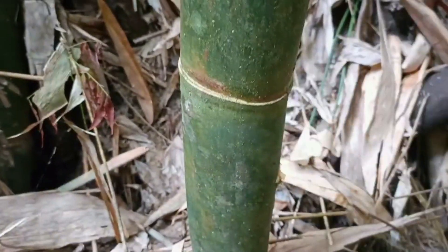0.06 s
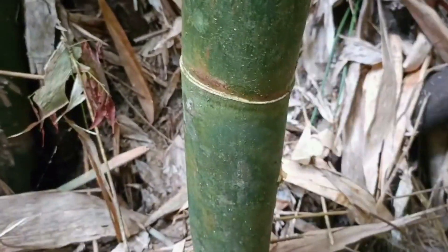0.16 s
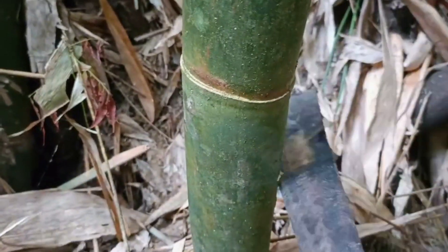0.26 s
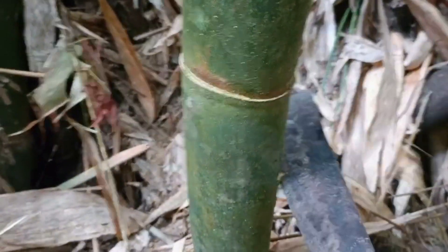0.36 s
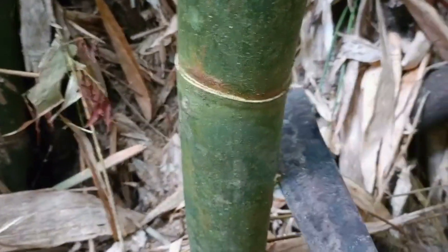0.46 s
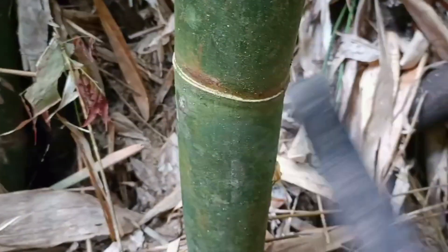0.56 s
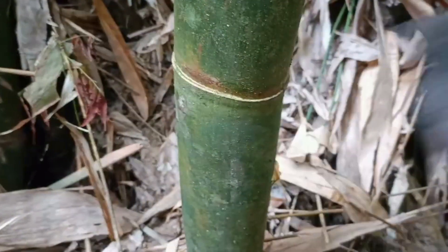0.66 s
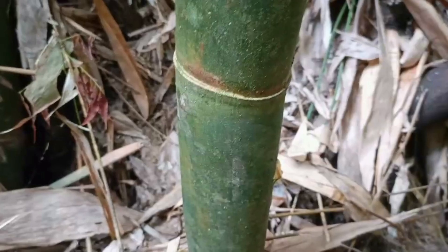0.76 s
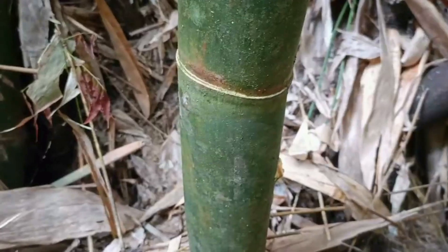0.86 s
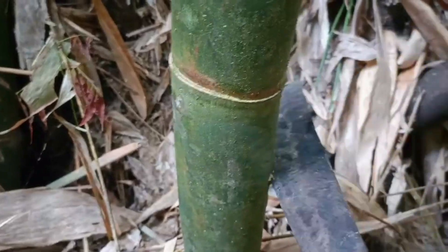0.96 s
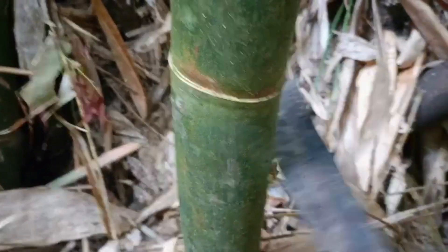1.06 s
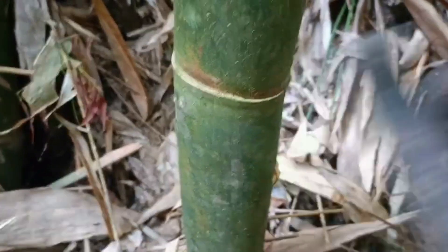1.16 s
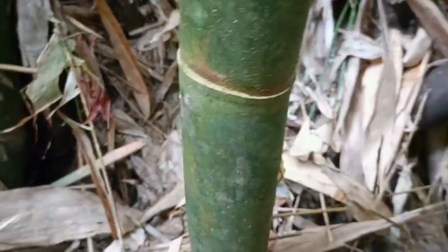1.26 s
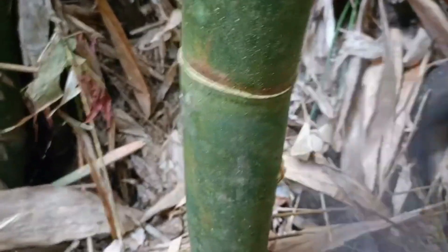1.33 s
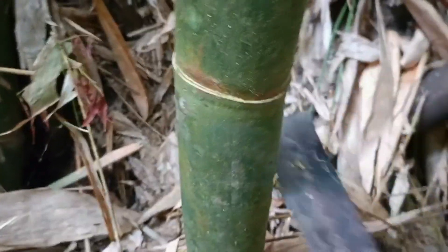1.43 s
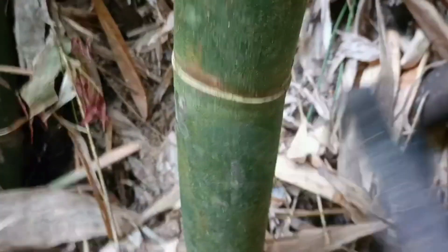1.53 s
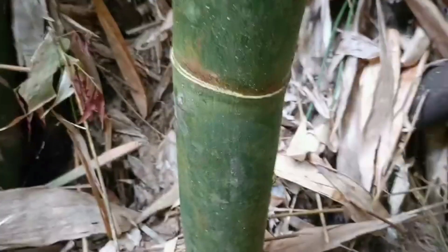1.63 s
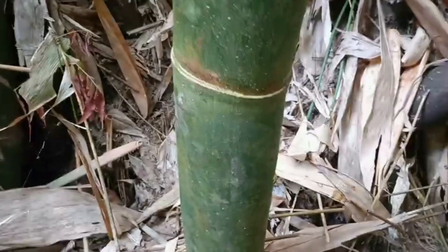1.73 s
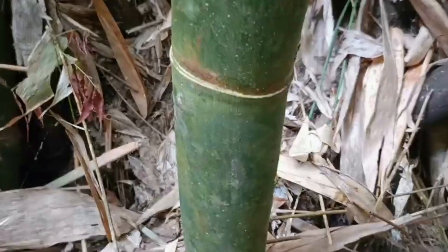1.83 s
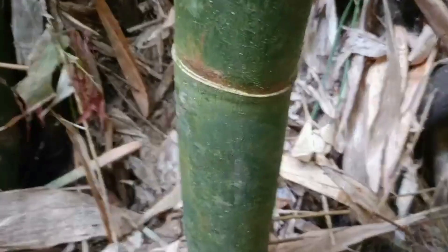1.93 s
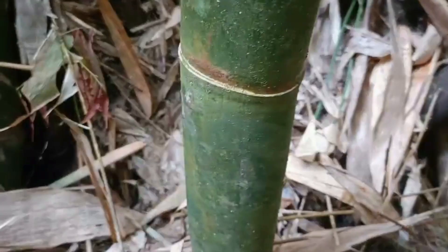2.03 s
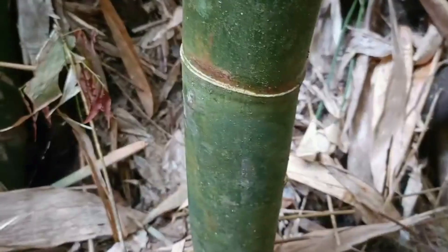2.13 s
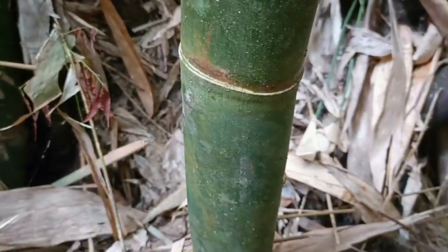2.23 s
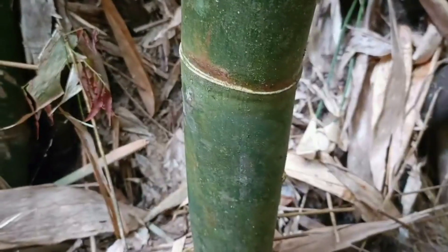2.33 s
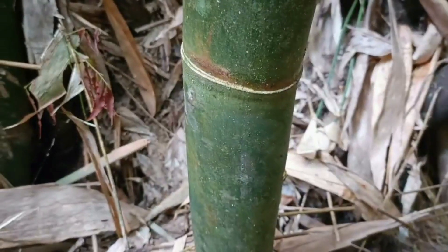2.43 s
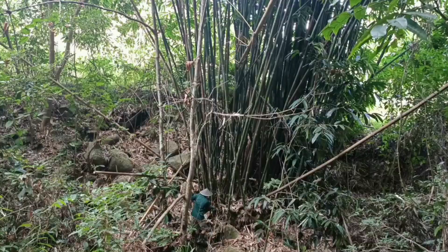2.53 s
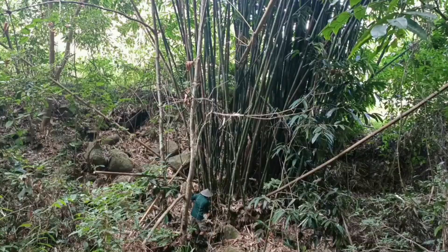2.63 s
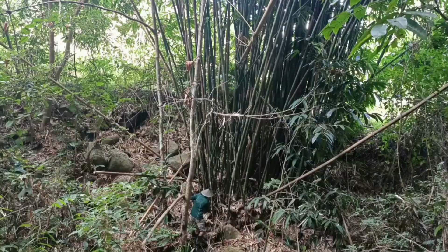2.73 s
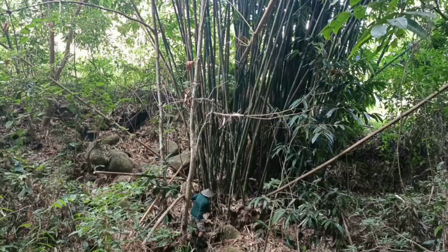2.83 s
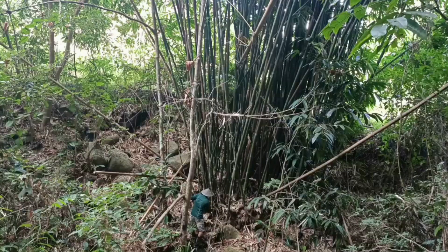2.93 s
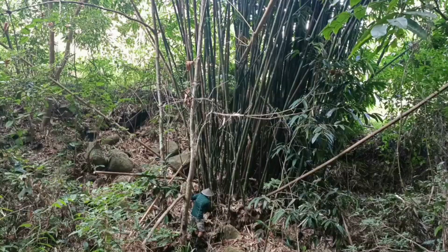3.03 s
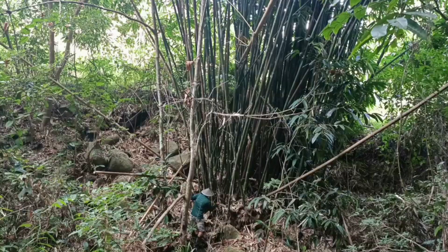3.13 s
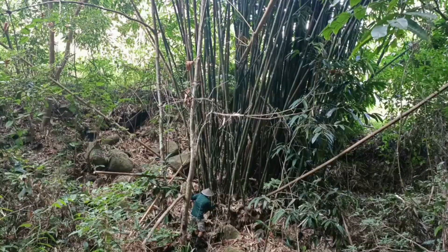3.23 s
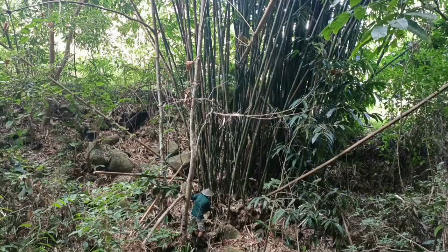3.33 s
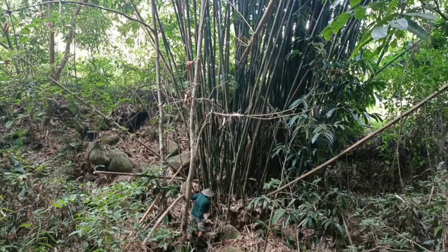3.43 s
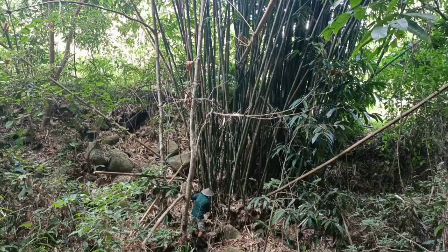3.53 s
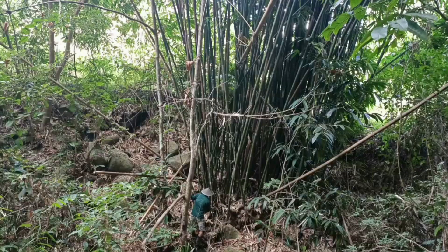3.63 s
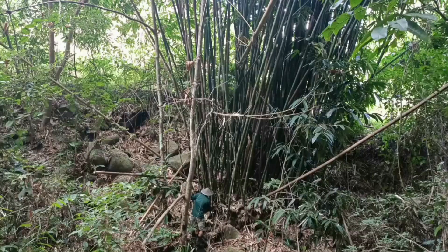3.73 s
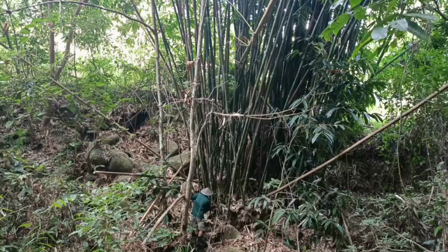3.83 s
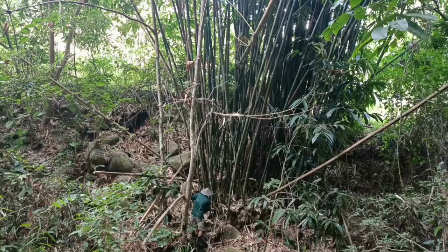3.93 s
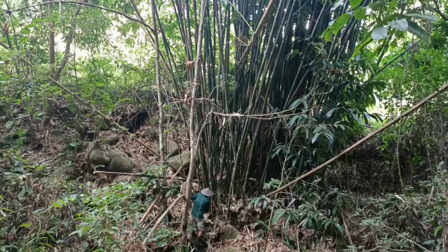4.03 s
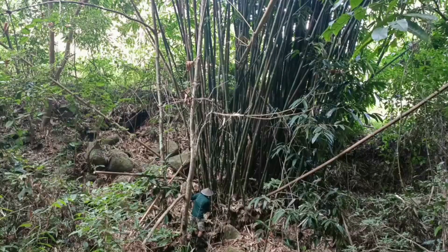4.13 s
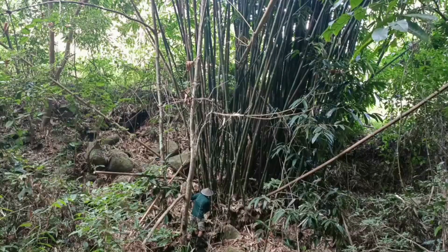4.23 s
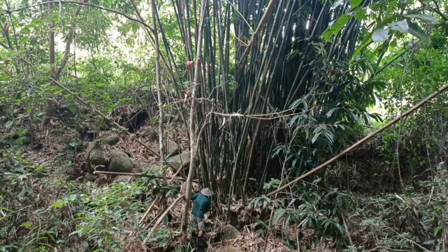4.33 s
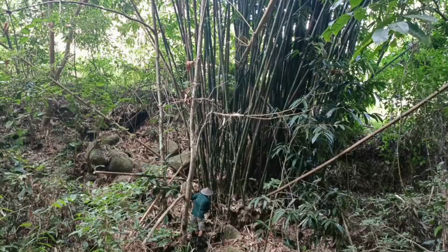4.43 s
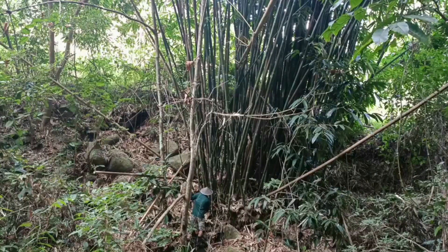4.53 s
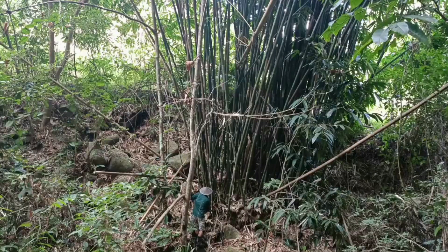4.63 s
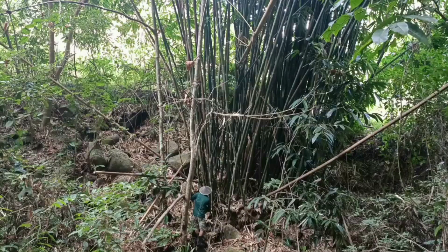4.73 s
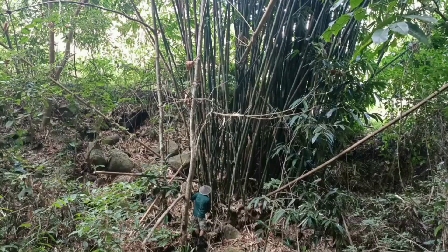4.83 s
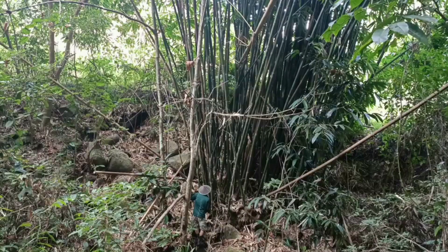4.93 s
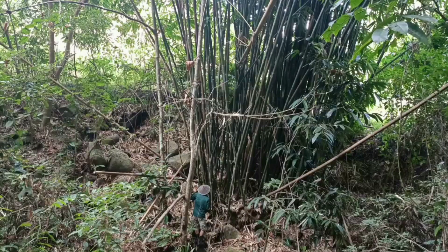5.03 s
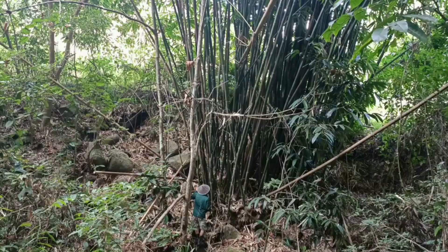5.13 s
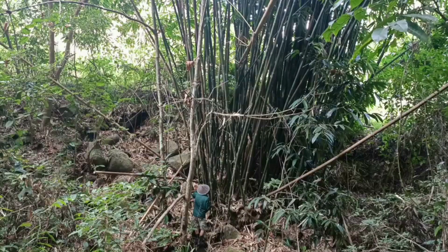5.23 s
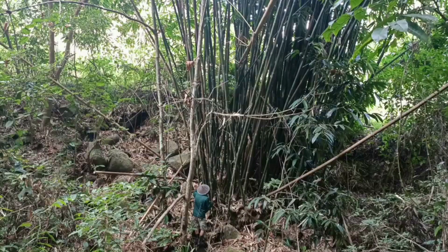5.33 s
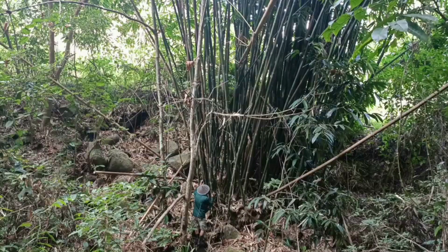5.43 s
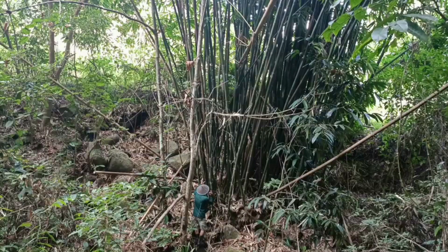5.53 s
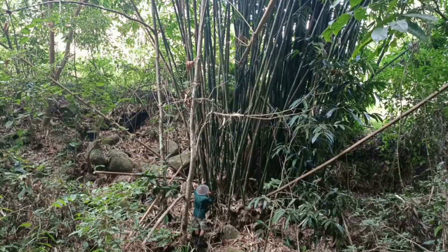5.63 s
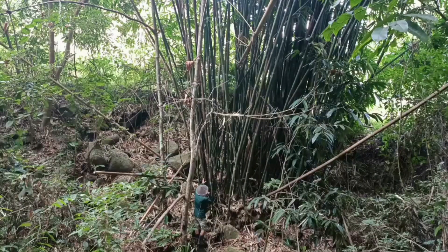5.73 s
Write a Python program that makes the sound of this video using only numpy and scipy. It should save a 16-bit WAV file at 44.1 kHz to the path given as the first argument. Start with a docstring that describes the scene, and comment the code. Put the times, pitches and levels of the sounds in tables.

```python
"""A blade chops a green bamboo stem in a forest: three blows close by, then four heard across a gully. Close: a
crack of noise, the blade's short decaying ring, and dispersive bending waves that return treble first. Far: a
thin crack, then a bright tail of decaying noise, scattered by the grove. Broad shaped noise washes under both
places, with soft bumps, taps, rustles and bits of far knocks as puffs of noise."""
import sys
import numpy as np
from scipy import signal
from scipy.fft import irfft
from scipy.io import wavfile
from scipy.ndimage import uniform_filter1d

SR = 44100
rng = np.random.default_rng(int(sys.argv[2]) if len(sys.argv) > 2 else 0)


def to_wav(sig):
    """Store sig (one row per channel, or 1-D mono) as 16-bit WAV at the path in sys.argv[1].

    Samples outside -1..1 are clipped; the rate is SR.
    """
    pcm = np.clip(np.atleast_2d(sig), -1, 1) * 32767
    pcm = np.round(pcm).astype(np.int16)
    wavfile.write(sys.argv[1], SR, pcm.T)  # frames by channels


N = 254213
T = np.arange(N) / SR
NEAR_END_S, FAR_START_S = 2.549, 2.5572  # a hush lies between the two places

# close blows: start_s, crack_db, crack_t60_s, stem_wave_db, bite_place (0-1), ring_db, ring_tilt_db_per_octave
NEAR_BLOWS = [(.405, -6, 0.02, -25, .192, -4.5, 1.5), (1.0781, -5.5, 0.024, -22, .212, -0.5, -2.8),
              (1.509, -6, 0.015, -19, 0.8, 2.5, -2)]
# modes of blade and stem: pitch_hz, t60_s, width_hz of the hump each gives the noise, level_db
RING_MODES = [(752, 0.08, 630, -8), (1460, 0.051, 120, 0.5), (1940, 0.074, 350, -11.5),
              (2297, 0.061, 440, 3.5), (3300, 0.019, 120, 1.5), (3814, 0.03, 590, -4.5),
              (4640, 0.042, 180, 3.5), (5400, 0.015, 270, -2.6), (6770, 0.016, 1100, 2.5),
              (10835, 0.023, 1600, 5)]
# left-right correlation of the noise at each place: frequency_hz, correlation (-1 to 1)
LIKENESS_NEAR = [(60, 0.67), (180, 0.98), (540, 0.83), (1620, -0.19), (4870, 0.043), (14600, 0.016)]
LIKENESS_FAR = [(60, 0.44), (180, 1), (540, 0.36), (1620, 0.012), (4870, -0.0027), (14600, -0.064)]


def gain_of(db):
    """The decibel is logarithmic: 20 dB is a tenfold amplitude."""
    return 10 ** (np.asarray(db) / 20)


def evened(x):
    """Normalization of power: scales to rms 1."""
    return x / np.sqrt(np.mean(x ** 2) + 1e-20)


def read(points, hz):
    """Interpolation of a spectrum along a logarithmic frequency axis."""
    point_hz, value = np.transpose(points)
    return np.interp(np.log(hz + 1), np.log(point_hz + 1), value)


def left_right(left_db, right_db):
    """Intensity panning: one level for each channel."""
    return np.array([[left_db], [right_db]])


def add(mix, s, sound):
    """Superposition: mixes a stereo sound in at time s."""
    part = mix[:, round(s * SR):][:, :sound.shape[1]]
    part += sound[:, :part.shape[1]]


def noise(size, field_db, likeness, frame):
    """Short-time synthesis of partly correlated stereo noise with levels field_db(Hz, s)."""
    hz = np.fft.rfftfreq(frame, 1 / SR)[:, None]
    t = np.arange(4 * size // frame + 5) * frame / 4 / SR
    a, b, c, d = rng.standard_normal((len(t), len(hz), 4)).T
    same = np.clip(read(likeness, hz), -1, 1)
    left, independent = a + 1j * b, c + 1j * d
    right = same * left + np.sqrt(1 - same ** 2) * independent
    bins = np.array([left, right]) * gain_of(field_db(hz, t))
    return signal.istft(bins, nperseg=frame, noverlap=3 * frame // 4)[1][:, :size]


def wash(colour, level_db, bass, likeness, patchy_db, pan_db):
    """Filtered random noise: a broad rush, its low end lumpy in patches and varying in level."""
    def field(hz, t):
        patches = rng.standard_normal((len(t), len(hz))).T
        patches = uniform_filter1d(uniform_filter1d(patches, size=14, axis=0), size=8, axis=1)
        bass_db = np.interp(t, *np.transpose(bass)) + patchy_db * evened(patches)
        return read(colour, hz) + bass_db / (1 + (hz / 1200) ** 2)
    return evened(noise(N, field, likeness, frame=1024)) * gain_of(level_db + left_right(pan_db, -pan_db))


def near_wash():
    """Quasi-stationary noise whose level dips at each blow and recovers exponentially."""
    # spectrum of the close wash: frequency_hz, level_db (relative, per Hz)
    colour = [(15, -76), (25, -82), (103, -13.5), (176, -16.5), (278, -4), (488, -7), (673, -11.5),
              (856, -3.5), (1090, -11.5), (1630, -9.5), (4620, -13.5), (7400, -16.5), (8100, -20),
              (14200, -21.5)]
    # bass of the close wash, before the whole is scaled: time_s, extra_db (fading out above some 1.2 kHz)
    bass = [(0.0, 4), (.5, 1.2), (1.2, 3.5), (2.55, 4)]
    level_db, dip_db, recover_s = -38, 4.5, 0.29
    for s, *_ in NEAR_BLOWS:
        level_db = level_db - dip_db * (T > s) * np.exp(-abs(T - s) / recover_s)
    return wash(colour, level_db, bass, LIKENESS_NEAR, patchy_db=2.4, pan_db=0.22)


def far_wash():
    """Quasi-stationary noise whose level drifts slowly."""
    # spectrum of the far wash: frequency_hz, level_db (relative, per Hz)
    colour = [(15, -60), (53, -21), (103, -3), (191, -19), (280, -4.5), (450, 0), (570, -8), (769, -1),
              (1100, -5.5), (1420, -5), (2370, -7.5), (7400, -13.5), (8100, -19), (14200, -21)]
    # course of the far wash: time_s, level_db
    course = [(2.56, -47), (4.1, -46.5), (5.76, -47.5)]
    level_db = np.interp(T, *np.transpose(course))
    return wash(colour, level_db, [(0, 0)], LIKENESS_FAR, patchy_db=1.5, pan_db=0.54)


def puffs(rows, likeness, pan_db, narrow_db):
    """Band-limited noise bursts: short puffs around one pitch."""
    out, t = np.zeros((2, N)), np.arange(6000) / SR
    for s, db, pitch_hz, length_s in rows:
        def field(hz, u):
            octaves = abs(np.log2((hz + 1) / pitch_hz))
            return -narrow_db * octaves ** 0.63 + 0 * u
        puff = evened(noise(len(t), field, likeness, frame=512))
        envelope = np.minimum(t / 0.0042, 1) * np.exp(-(t / length_s) ** 3)
        add(out, s, gain_of(db) * puff * envelope)
    return out * gain_of(left_right(pan_db, -pan_db))


def rings_struck(place, level_db, tilt_db):
    """Modal excitation: a mode rings strongly if struck at a crest of its shape, weakly at a node."""
    hz, *_, db = np.transpose(RING_MODES)
    half_waves = np.sqrt(hz / 84.1)  # along the blade; one at 84.1 Hz
    shape = abs(np.sin(np.pi * place * half_waves)) + .05
    return db + level_db + tilt_db * np.log2(hz / 3000) + 20 * np.log10(shape)


def struck(colour, hz, rings_db, lift_db):
    """Resonance: the common spectrum gains a hump at every mode, as high as the mode was struck hard."""
    humps = 0
    for (mode_hz, _, width_hz, _), db in zip(RING_MODES, rings_db):
        humps = humps + gain_of(db + lift_db) / (1 + (2 * (hz - mode_hz) / width_hz) ** 2)
    return read(colour, hz) + 20 * np.log10(1 + humps)


def crack(colour, rings_db, likeness, envelope, lift_db, ring_db, rise_s, uneven_db):
    """Impulsive excitation: fibres split in an uneven noise burst, and the same blow starts free decays."""
    t = np.arange(6000) / SR

    def field(hz, s):
        return struck(colour, hz, rings_db, lift_db) + 0 * s
    burst = evened(noise(len(t), field, likeness, frame=256))
    roughness = evened(uniform_filter1d(rng.standard_normal(len(t)), size=60))
    burst = burst * envelope(t) * gain_of(uneven_db * roughness)
    ring = 0
    for (hz, t60, *_), db in zip(RING_MODES, rings_db):
        turn = rng.random((2, 1))  # starting phase per channel, in cycles
        ring = ring + gain_of(db - 60 * t / t60) * np.sin(2 * np.pi * (hz * t + turn))
    return (burst + gain_of(ring_db) * ring) * np.minimum(t / rise_s, 1) ** 2


def far_blows():
    """Multiple scattering: the nearest stems stretch the crack to some 15 ms and the grove adds a tail."""
    # far blows: start_s, crack_db, rise_s, tail_db, late_share (0-1), bite_place (0-1),
    # ring_db, ring_tilt_db_per_octave
    blows = [(2.844, -26, 0.00057, -28.5, 0.2, .796, -.7, -.4),
             (3.633, -23.5, 0.0011, -28, 0.1, .716, -2.1, -2.8),
             (4.231, -35, .003, -36, 0.6, .956, -1.2, -3.6), (4.658, -41, 0.009, -45, 0.34, .67, 5, -3)]
    # spectra of the far crack and of the tail: frequency_hz, level_db (relative, per Hz)
    crack_colour = [(120, -37), (300, -21), (1000, 0.5), (2300, -0.5), (2700, -9), (3200, -3), (7400, 1),
                    (8100, -9), (14200, -7)]
    tail_colour = [(88, -55), (243, -7), (459, -5.5), (620, -16), (1270, -5.5), (2300, -3.5), (2700, -6.5),
                   (3200, -5.5), (7300, -9.5), (8100, -11), (14200, -17)]
    # decay of the tail: frequency_hz, t60_s
    tail_t60 = [(200, 0.35), (1500, 0.38), (5000, 0.62), (12000, 0.59)]
    out, t = np.zeros((2, N)), np.arange(30000) / SR
    for s, db, rise_s, tail_db, late, *bite in blows:
        rings_db = rings_struck(*bite)

        def stretched(u):
            return (1 + 0.72 * np.exp(-u / 0.0017)) * np.exp(-((u - rise_s) / 0.015) ** 4)

        def tail_field(hz, u):
            return struck(tail_colour, hz, rings_db, 3.2) - 60 * u / read(tail_t60, hz)
        direct = crack(crack_colour, rings_db, LIKENESS_FAR, stretched,
                       lift_db=22.0, ring_db=-4, rise_s=rise_s, uneven_db=0.75)
        add(out, s, gain_of(db + left_right(2.2, -2.2)) * direct)
        tail = noise(len(t), tail_field, LIKENESS_FAR, frame=512)
        tail = tail / np.std(tail[:, :2000])
        late = np.clip(late, 0, 1)
        early_part = (1 - late) * np.minimum(t / 0.0025, 1)
        late_part = 2.9 * late / (1 + np.exp(-(t - .045) / 0.016))  # a farther slope answers
        # single stems answer unevenly
        stems_db = 0.69 * evened(uniform_filter1d(rng.standard_normal(len(t)), size=200))
        add(out, s, gain_of(tail_db + stems_db + left_right(2.1, -2.1)) * (early_part + late_part) * tail)
    return out


def stem_wave(count=70, stiff_hz=90.76, spread_s=0.00082, apart=0.37):
    """Dispersion: bending waves return from nodes and branches, treble first, as speed grows as sqrt(Hz)."""
    # spectrum of the stem wave: frequency_hz, level_db (relative, per Hz)
    colour = [(18, -74), (30, -52), (112, -8.5), (160, -16.5), (199, -5.5), (238, -17.5), (290, 0),
              (424, -10.5), (478, -7.5), (698, -15.5), (771, -6), (922, -12.5), (1150, -11), (1580, -22),
              (3500, -27), (4550, -76), (7700, -120)]
    first_s, build_s, hold_s, fall_db_per_s, last_s = 0.0074, 0.029, 0.053, 385, .12
    hz = np.fft.rfftfreq(16384, 1 / SR)
    draw = rng.random((count, 5))
    travel_s = last_s * (np.arange(count) + draw[:, 0]) / count  # at 300 Hz
    # the first waves die at once; echoes build up, hold, then fall away
    echoes = np.minimum(travel_s / build_s, 1) * gain_of(-fall_db_per_s * np.maximum(travel_s - hold_s, 0))
    size = (np.exp(-travel_s / first_s) + echoes) * np.sign(draw[:, 1] - .5)
    # the rooted foot keeps the lowest waves from lagging far
    bend = np.sqrt((300 + stiff_hz) * (hz + stiff_hz))
    out = []
    # each return leaves the stem at another height and angle
    for skew, side in ((draw[:, 2], 1), (draw[:, 3], -1)):
        phase = 4 * np.pi * travel_s[:, None] * bend + 2 * np.pi * hz * spread_s * skew[:, None]
        share = 1 + side * apart * (4 * draw[:, 4] - 2)
        returns = (size * share) @ np.exp(-1j * phase)
        out.append(irfft(gain_of(read(colour, hz)) * returns)[:12000])
    out = np.array(out)
    return out / np.sqrt(np.mean(out[:, :3000] ** 2))


def hollow(note_hz=282.3, glide=3.3):
    """Cavity resonance: the hollow section booms as slow waves arrive, each note sagging in pitch."""
    # arrivals at the hollow section: delay_s, level_db, length_s
    arrivals = [(.038, -1.5, 0.022), (.059, -6, 0.014), (.083, -15, .014)]
    out = np.zeros((2, 6000))
    for s, db, length_s in arrivals:
        t = np.arange(round(length_s * SR)) / SR
        turn, offset = rng.random(2)
        turns = turn + 0.062 * np.array([[0], [offset]])  # the right channel leads slightly in phase
        cycles = note_hz * t * (1 - glide * (t - length_s))
        note = np.sin(2 * np.pi * (cycles + turns))
        add(out, s, gain_of(db) * note * signal.windows.tukey(len(t), .6))
    return out


def near_blows():
    """Impact: a crack, stem wave, hollow note, low push through the ground, splinter hiss and close echoes."""
    # spectrum of the close crack: frequency_hz, level_db (relative, per Hz)
    colour = [(350, -40), (700, -11), (2000, -4.5), (5000, 5), (8000, -6.5), (12000, -9), (15000, -9)]
    hollow_db, thud_db = 2.2, -6  # against the stem wave
    spray_db = -19.5  # against the crack
    out, t = np.zeros((2, N)), np.arange(9000) / SR
    push = (t / 0.0043) * (1 - t / 0.014) * np.exp(-t / 0.0038)
    for s, db, t60, wave_db, *bite in NEAR_BLOWS:
        rings_db = rings_struck(*bite)

        def decay(u):
            return gain_of(-60 * u / t60)

        def spray_field(hz, u):
            return struck(colour, hz, rings_db, 9.4) - 60 * u / 0.19
        direct = crack(colour, rings_db, LIKENESS_NEAR, decay,
                       lift_db=3.7, ring_db=-9, rise_s=0.0012, uneven_db=0.61)
        add(out, s, gain_of(db) * direct)
        add(out, s, gain_of(wave_db) * stem_wave())
        add(out, s, gain_of(wave_db + hollow_db) * hollow())
        add(out, s, gain_of(wave_db + thud_db + left_right(-4, 2.)) * push)
        spray = noise(len(t), spray_field, LIKENESS_NEAR, frame=256)
        spray = spray / np.std(spray[:, :500]) * np.minimum(t / 0.001, 1)
        add(out, s, gain_of(db + spray_db) * spray)
    return out


def scene():
    """Superposition of sources: the close place fades out quickly, then the far one fades in."""
    # soft bumps, taps and rustles: start_s, level_db, pitch_hz, length_s; rows before the hush sound in the
    # close place, the rest in the far place; the rows at 2.555 and 2.574 s are the fading end of an earlier far
    # knock, and the row at 4.661 s is the low body of the far blow at 4.658 s
    bumps = [(0.13, -40, 430, 0.043), (.97, -46, 1100, 0.036), (1.887, -47, 299, 0.014),
             (2.053, -41.5, 497, 0.043), (2.196, -35.5, 630, 0.041), (2.352, -37, 433, 0.042),
             (2.430, -33.5, 332, 0.012), (2.469, -37, 650, 0.019), (2.518, -32.5, 616, 0.029),
             (2.539, -33, 3620, 0.01), (2.555, -32.5, 1450, 0.018), (2.574, -42, 1500, 0.036),
             (2.697, -46, 450, 0.014), (2.736, -46, 3060, 0.022), (3.697, -44, 4200, .008),
             (4.288, -49, 4500, .02), (4.661, -45.5, 596, 0.028), (4.72, -53, 900, 0.026)]
    here = [bump for bump in bumps if bump[0] < NEAR_END_S]
    there = [bump for bump in bumps if bump[0] > NEAR_END_S]
    near = near_wash() + puffs(here, LIKENESS_NEAR, pan_db=.1, narrow_db=13.0) + near_blows()
    far = far_wash() + puffs(there, LIKENESS_FAR, pan_db=2.2, narrow_db=17) + far_blows()
    fade_s, hush = .0015, gain_of(-16)
    near_gain = np.clip((NEAR_END_S - T) / fade_s, 0, 1)
    # through the hush the far place is already faintly there
    floor = hush * (T > NEAR_END_S - fade_s)
    far_gain = np.clip((T - FAR_START_S) / fade_s, floor, 1)
    return near * near_gain + far * far_gain


def record(dry):
    """Soft saturation rounds the loudest cracks; a linear-phase low-pass then limits the band."""
    full, edge_hz = 1.1, 14500
    lowpass = signal.firwin(511, edge_hz, window=("kaiser", 9), fs=SR)
    return signal.oaconvolve(full * np.tanh(dry / full), lowpass[None], "same")


dry = scene()
out = record(dry)
to_wav(out)
```